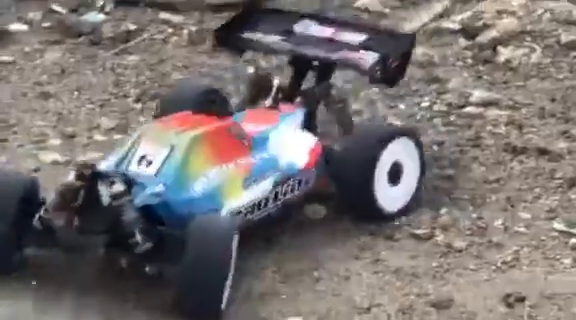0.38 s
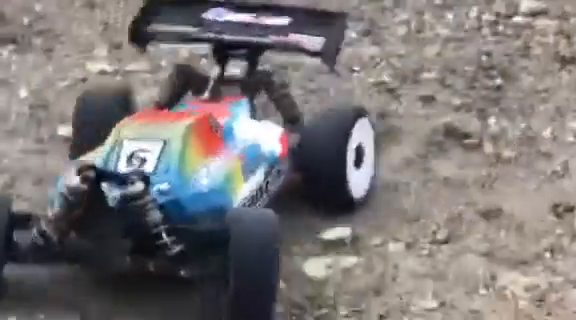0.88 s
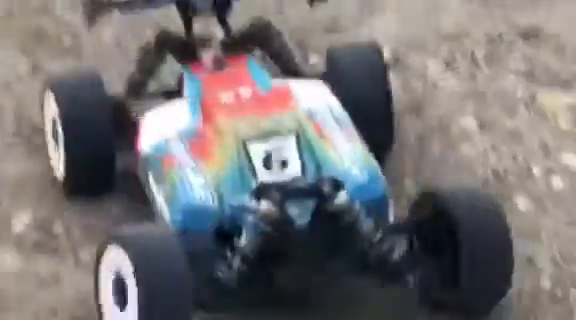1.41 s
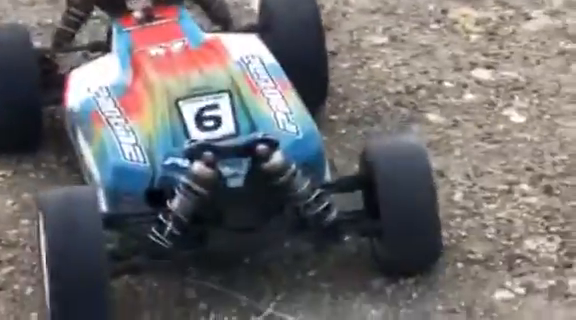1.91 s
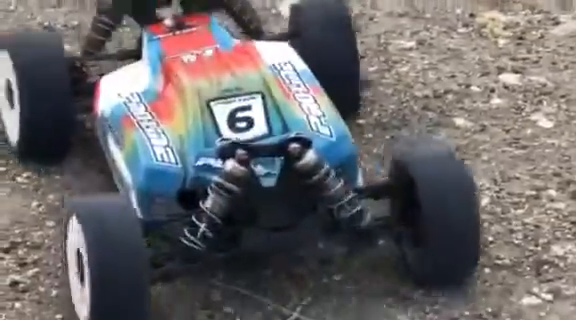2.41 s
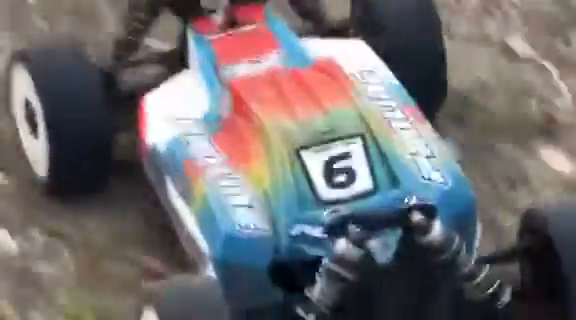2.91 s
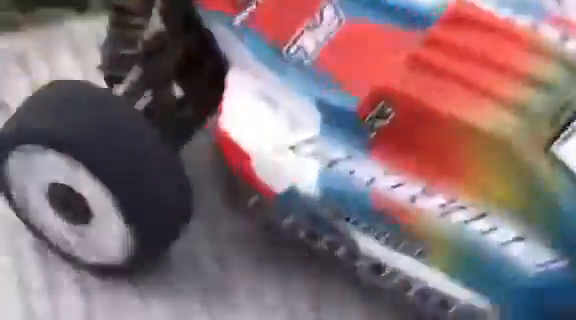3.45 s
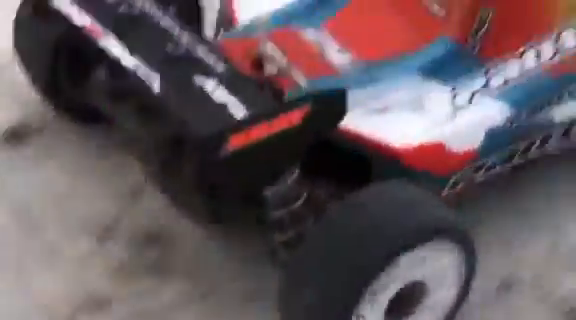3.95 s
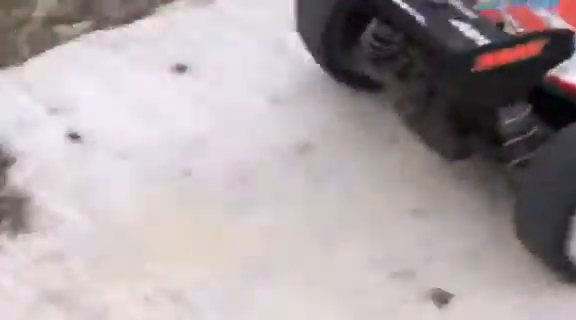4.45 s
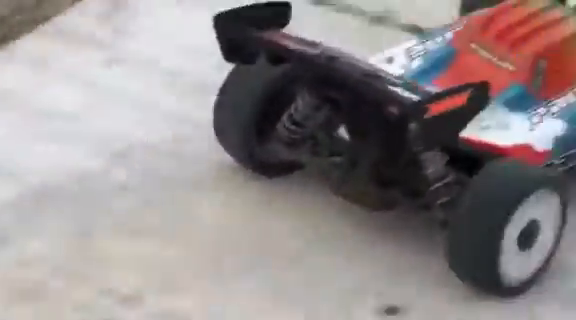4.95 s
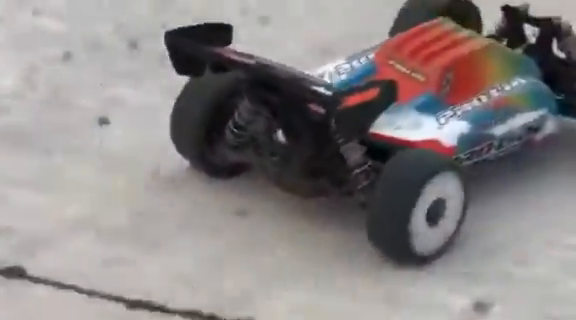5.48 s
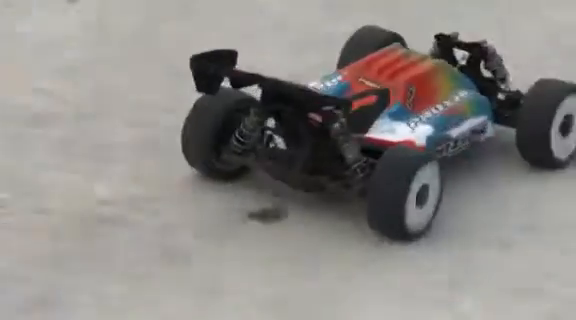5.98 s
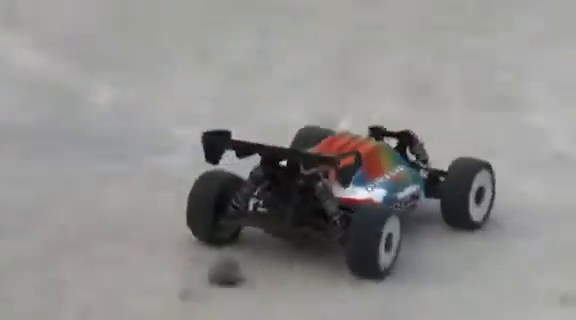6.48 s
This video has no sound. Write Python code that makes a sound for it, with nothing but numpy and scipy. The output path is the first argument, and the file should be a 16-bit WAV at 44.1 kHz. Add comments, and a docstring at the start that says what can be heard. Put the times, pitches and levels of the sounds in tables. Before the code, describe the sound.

A quiet outdoor hush opens, then at about 0.2 s a small electric buggy gives a short, rough buzz with hard plastic knocks. A second burst from 0.65 to 1.1 s swoops quickly up in pitch and back down, gears whining and scraping. From 1.1 to 2.4 s it is almost still: faint ticks, a few thin distant bird chirps, a sharper one near 2.3 s. At 2.4 s it clacks into motion, and a wavering mid-pitched whine climbs with hollow rattle and gravel crunch. The loudest cluster of knocks comes around 4.1 s, and the whine keeps rising until 4.7 s. It drops to a faint coasting rattle while wind thumps begin. At 5.25 s knocks start the last run, noisy and dry, rising to about twice its pitch by 6.6 s, with a hard clack near 6.4 s under heavy low wind buffeting.

```python
"""Outdoors on gravel, a small electric buggy runs in short bursts of throttle beside a microphone.
Meshing gear teeth whine and scrape, throbbing once a motor turn, and ring the plastic chassis as resonators;
the drive knocks as it takes up slack, and the crunch of gravel (clusters of resonant pings) comes and goes.
Wind eddies (slowly modulated low-frequency noise) buffet the microphone.
A few far birds (gliding sines with echoes) chirp over a quiet hush of flickering filtered noise."""
import sys
import numpy as np
from scipy import signal
from scipy.fft import rfft, irfft, next_fast_len
from scipy.io import wavfile
from scipy.ndimage import uniform_filter1d

SR = 44100
rng = np.random.default_rng(int(sys.argv[2]) if len(sys.argv) > 2 else 0)


def magnitude_from_level(level_db):
    """Linear magnitude for a level in decibels (20 dB per decade)."""
    exponent = np.asarray(level_db, float) / 20
    return 10 ** exponent


def store_wav(level_fs):
    """Save 16-bit WAV to argv[1]."""
    pcm = np.round(np.clip(np.atleast_2d(level_fs), -1, 1) * 32767)
    wavfile.write(sys.argv[1], SR, pcm.T.astype(np.int16))


N = 291721
T = np.arange(N) / SR  # time, s

# bursts of throttle, one list each: t/s, tooth rate f/Hz, whine level/dB, clatter level/dB, sizzle level/dB
THROTTLE_BURSTS = [
    [(0.219, 602, -47, -51, -55), (0.308, 608, -66, -47, -54.5), (0.374, 592.5, -51, -45.5, -58.5),
     (0.443, 595, -55, -56.5, -55.5)],
    [(0.647, 582.6, -57, -54, -52), (0.686, 641, -41, -51, -52), (0.71, 704.5, -50, -43, -54),
     (0.745, 831, -40.5, -47, -44.5), (0.81, 928, -41, -44.5, -47), (0.86, 700, -50.5, -43, -54.5),
     (0.924, 581, -47.5, -51, -54), (0.986, 630, -48, -50.5, -55.5), (1.074, 598, -44, -49, -52),
     (1.108, 581.1, -51.5, -56, -58)],
    [(2.398, 419.5, -62, -41.5, -40.5), (2.452, 438.6, -42, -42.5, -52), (2.61, 444, -50.5, -48, -59),
     (2.69, 545.6, -46.5, -48, -56.5), (2.82, 612.3, -44, -49, -53.5), (2.958, 666, -40.5, -48.5, -56.5),
     (3.03, 633, -41, -46, -55.5), (3.32, 638.7, -48, -43, -50), (3.37, 649, -43.5, -40.5, -47.5),
     (3.47, 681.6, -41, -42.5, -48.5), (3.584, 684.3, -43, -41, -48.5), (3.674, 698, -43.5, -41.5, -46),
     (3.88, 738, -38, -43.5, -47.5), (3.94, 779.7, -41, -43, -47)],
    [(4.045, 747.5, -43.5, -41.5, -40), (4.135, 772, -33, -49, -45), (4.153, 769.5, -44.5, -44.5, -46.5),
     (4.26, 813.4, -41.5, -46, -51), (4.4, 834, -40, -44.5, -50), (4.483, 841, -44, -45, -49),
     (4.56, 862, -41.5, -47, -50), (4.681, 868, -40.5, -46, -50.5), (4.705, 873, -43, -48, -57)],
    [(5.25, 614.6, -60, -55, -52), (5.295, 600, -46, -41, -46), (5.32, 610, -43.5, -41.5, -50.5),
     (5.42, 670, -40.5, -47.5, -54.5), (5.52, 721.6, -44.5, -44.5, -52.5), (5.62, 771.4, -47, -46, -56),
     (5.7, 845, -44.5, -44.5, -54.5), (5.8, 872, -47, -42, -51.5), (5.91, 883, -44, -43, -49.5),
     (5.93, 956, -58, -45.5, -53.5), (5.98, 1013, -50.5, -43.5, -52.5), (6.1, 1107, -60, -42, -52.5),
     (6.2, 1185, -52.5, -45.5, -51.5), (6.355, 1222, -50, -44.5, -52.5), (6.409, 1230, -55, -47.5, -51.5),
     (6.61, 1250, -49.5, -49, -55)],
]
# rolling off throttle: start t/s, clatter level/dB, tub ring level/dB, sizzle level/dB, fade/(dB/s)
COASTING = [(0.0, -68, -59, -56, 13), (0.048, -72, -61.5, -83, -4), (0.443, -59, -60, -68, 48),
            (1.108, -60, -66, -65.5, 27), (3.94, -47.5, -53, -50, -1), (4.705, -55.5, -58, -56.5, 4)]
# colour of each burst as the buggy turns: tub ring over clatter level/dB at its start, at its end,
# initial surge of the sizzle level/dB
FACING_COLOUR = [(4, 2.5, 2.7), (8.5, 4.5, 1.8), (-10, 6, 3.4), (5.5, 2.5, 3.8), (0.5, -11, 4)]
# timbre of the gears: t/s, buzz over whine level/dB, gearbox ring over sizzle level/dB,
# gearbox ring f/Hz, gravel over sizzle level/dB
GEAR_TIMBRE = [(0.22, 2, -11, 2670, -7), (0.44, -2.5, -8, 2630, -3.5), (0.65, 0, 1, 2890, -1),
               (0.8, -4.5, -16, 3060, 5.5), (1.1, -6, -7, 2730, 2), (2.4, -19, -4.5, 2720, 1),
               (2.62, -2.5, -1, 2780, 9.5), (2.74, -4.5, -9, 2930, 7.5), (2.95, -10.5, 7, 2840, 8),
               (3.2, -10, -2, 2830, 6.5), (3.4, -20, -2.5, 2760, 0), (3.75, -17.5, -1.5, 2790, -13),
               (3.94, -17, -8, 2850, -23), (4.05, -10, -11, 2610, -14), (4.3, -11, 2, 2510, -3),
               (4.7, -19, -6.5, 2540, -14), (5.26, -9, -32, 2880, -19), (5.6, -7, -7, 2950, 0.5),
               (5.9, -8, -10, 2940, 1.5), (5.97, 10, -7, 2970, 1.5), (6.08, 9, -15, 3200, 5.5),
               (6.2, -13, -24, 3030, -18), (6.61, -23, -29, 3050, -12)]
# how deeply the tooth rate hunts up and down: t/s, depth (relative)
HUNT_DEPTH = [(0.2, .04), (1.1, .04), (2.4, .04), (2.75, .028), (3.3, .022), (3.36, .06), (3.9, .055),
              (4.1, .025), (4.7, .03), (5.3, .04), (5.9, .035), (6.6, .02)]
# axle gear rates as shares of the pinion's tooth rate (ratio)
AXLE_RATE_RATIOS = (.87, 1.11)
# jolts as the teeth bite or a stone strikes the chassis: t/s, peak level/dB, chatter rate f/Hz,
# length t/s, crack over chatter level/dB
JOLTS = [(0.115, -42.5, 578, 0.013, -14), (0.219, -24.5, 843, 0.028, 1), (0.232, -27, 778, 0.016, -7),
         (0.244, -36, 557, 0.013, -8), (0.295, -26.5, 577, 0.0082, -18), (0.328, -30.5, 735, 0.015, -14),
         (0.65, -24, 604, 0.0067, 15), (0.669, -20.5, 646.5, 0.014, -6), (0.741, -21.5, 906, 0.029, -17),
         (0.725, -26, 766, 0.011, -24), (0.91, -29, 560, 0.015, -23.5), (1.237, -43, 624, 0.03, -5),
         (1.876, -51, 1315, 0.02, -9), (1.931, -48, 1301, 0.088, -5), (2.395, -30, 570, 0.016, -6),
         (2.412, -22.5, 648, 0.013, 15), (2.515, -21, 617.6, 0.023, -25), (2.771, -46, 650, 0.018, -13),
         (3.273, -24, 659, 0.034, -25), (2.864, -29, 611, 0.012, -6), (3.012, -33, 664.5, 0.013, -8),
         (3.342, -21, 600.6, 0.017, -3), (3.374, -25.5, 1084, 0.016, -21), (3.418, -30, 655, 0.016, -5),
         (3.755, -35, 728.5, 0.014, -11), (4.011, -39, 819, 0.034, 1), (4.04, -25.5, 872, 0.014, -6),
         (4.067, -15, 769, 0.018, -4), (4.096, -21, 756, 0.015, -16), (4.12, -13, 800.6, 0.025, -28),
         (4.201, -25, 849, 0.014, -10), (4.233, -20.5, 815.5, 0.015, -21), (4.439, -27, 836, 0.029, -13),
         (4.77, -31, 765, 0.032, -6.5), (4.85, -41, 1440, 0.042, -14), (4.94, -41, 735, 0.013, -1),
         (5.253, -31, 698, 0.01, -2), (5.266, -24, 707, 0.012, -3), (5.278, -16.5, 687.3, 0.013, -4),
         (5.331, -23.5, 621, 0.015, -28), (5.865, -25, 861, 0.022, -22), (6.376, -15.5, 620, 0.017, -6),
         (6.39, -28.5, 639, 0.035, 0)]
# modes of the plastic chassis: f/Hz, bandwidth f/Hz, relative level/dB
CHASSIS_MODES = [(560, 97, -4), (872, 118, -1.5), (1240, 320, -1), (1398, 120, 1), (1805, 86, -2.5),
                 (2186, 71, 1), (2338, 27, -2), (2680, 320, -15), (3600, 960, -14.5), (3880, 210, -22.5),
                 (5050, 250, -28), (6200, 56, -8.5), (8500, 120, -15)]
# spectral shape of the clatter: f/Hz, relative level/dB
CLATTER_SHAPE = [(210, -42), (350, -4), (526, -6.5), (599, 3), (951, -0.5), (1470, -2.5), (1960, 3),
                 (2490, -10.5), (3200, -56), (4160, -59.5), (7040, -120)]
# spectral shape of the sizzle and gravel: f/Hz, relative level/dB
SIZZLE_SHAPE = [(1470, -9.5), (2500, 0), (3150, -0.5), (4380, -1), (4980, -8.5), (6800, -6), (8520, -6.5),
                (9190, -20), (9960, -65.5), (12900, -104), (21900, -120)]
# the breeze under the gusts: t/s, rumble level/dB, flutter above it level/dB
BREEZE = [(0.0, -50, -4), (0.4, -51, 6), (0.86, -48.5, -7), (0.96, -45, -2.5), (2.03, -49, 1.5),
          (2.4, -48, 2), (2.89, -50, -5), (3.46, -48.5, 4), (3.83, -49, 17.5), (4.1, -45, 7),
          (4.64, -45.5, 6.5), (4.85, -37.5, 0.5), (5.5, -31, -17.5), (5.9, -43, -14), (6.3, -28.5, -15),
          (6.61, -35.5, -16)]
# eddies that thump the microphone: t/s, peak level/dB, length t/s, flutter above it level/dB
EDDIES = [(0.194, -45.5, 0.2, -1), (0.44, -42.5, 0.037, -3), (2.076, -43.5, 0.063, -19),
          (2.428, -29.5, 0.054, 3), (2.468, -27.5, 0.055, 13), (2.619, -37, 0.092, -20),
          (2.976, -40, 0.12, 2), (3.174, -35.5, 0.037, -32), (3.906, -41.5, 0.099, 1),
          (4.152, -36.5, 0.061, -15), (4.312, -37, 0.029, -22), (4.471, -26.5, 0.028, -25),
          (4.543, -30.5, 0.031, -27), (4.783, -36, 0.056, 0), (4.933, -20, 0.038, -10),
          (4.988, -21, 0.025, -6), (5.069, -27, 0.085, -22), (5.214, -28, 0.019, -16),
          (5.258, -20.5, 0.026, -10), (5.395, -31, 0.041, -14), (5.569, -21, 0.043, -15),
          (5.641, -28, 0.033, -12), (5.761, -31.5, 0.046, -16), (5.842, -27, 0.031, -20),
          (5.908, -28, 0.029, -28), (5.972, -20.5, 0.078, -8), (6.062, -20.5, 0.014, -20),
          (6.134, -19, 0.017, -8), (6.188, -22.5, 0.022, -17), (6.25, -21, 0.052, -24),
          (6.325, -18, 0.014, -7), (6.443, -22, 0.047, 4.5)]
# spectral shape of the wind rumble before its band limits: f/Hz, relative level/dB
RUMBLE_SHAPE = [(12, -36), (20, -24), (50, 5), (107, 2.5), (141, 3), (242, -9), (344, -19), (380, -28.5),
                (400, -38), (520, -43), (880, -120)]
# far birds: start t/s, length t/s, first f/Hz, middle f/Hz, last f/Hz, level/dB
BIRD_CHIRPS = [(.14, .025, 3100, 2800, 2400, -68), (1.1, .1, 4300, 4200, 4080, -74),
               (1.325, .015, 6500, 5600, 4700, -70), (1.49, .06, 5350, 6100, 5600, -71),
               (1.495, .06, 3750, 4050, 3850, -71), (1.808, .014, 6200, 5900, 5600, -73),
               (1.826, .012, 6100, 5600, 5000, -68), (1.837, .012, 5900, 5400, 4900, -73),
               (2.14, .13, 5000, 4650, 4300, -74.5), (2.272, .014, 6600, 5800, 5000, -68),
               (2.287, .013, 6800, 5900, 4900, -61), (2.298, .013, 6500, 5800, 5100, -67),
               (6.494, .013, 3500, 3300, 3150, -52)]
# spectral shape of the outdoor hush: f/Hz, relative level/dB
HUSH_SHAPE = [(150, -41), (250, -6), (516, -18), (1030, -16.5), (1300, -17.5), (1550, -16.5), (1800, -16.5),
              (2100, -23.5), (2560, -23), (5460, -30), (9220, -33.5), (9960, -75), (12900, -86),
              (21900, -120)]
# narrow dips that come and go: f/Hz, bandwidth f/Hz, depth about which each wanders (0-1)
TREBLE_DIPS = [(2050, 110, .2), (2750, 130, .3), (3500, 150, .25), (4200, 150, .15), (4900, 200, .7),
               (5900, 250, .3), (6700, 250, .25), (7600, 300, .7), (8200, 250, .5), (9150, 500, .6)]

PINION_TEETH = 21
TUB_HZ = 1436  # the mode that rings most readily
AXLE_DB, FULL_HUNT = -6, .06  # axle gears have this median level where hunting reaches FULL_HUNT
SURGE_S = 0.018  # the sizzle flares as the motor takes the load
GUST_SKEW = 1.03  # an eddy dies away this much slower than it comes
HUSH_DB = -59


def level(x, db):
    """Normalisation: scale a signal to an rms level in dB."""
    return x * magnitude_from_level(db) / np.sqrt(np.mean(x ** 2))


def curves(rows):
    """Linear interpolation: columns of a table as one value per sample."""
    s, *columns = np.transpose(rows)
    return [np.interp(T, s, c) for c in columns]


def colour(x, points):
    """Linear filtering: weight the spectrum by (Hz, dB) points on a logarithmic frequency axis."""
    hz, db = np.transpose(points)
    size = next_fast_len(N)
    f = np.maximum(np.arange(size // 2 + 1) * SR / size, 1)
    gain = magnitude_from_level(np.interp(np.log(f), np.log(hz), db))
    return irfft(rfft(x, size) * gain, size)[:N]


def ring(x, hz, width_hz):
    """Resonance: a single mode with quality factor hz / width_hz."""
    return signal.lfilter(*signal.iirpeak(hz, hz / width_hz, SR), x)


def sliding_ring(x, hz, width_hz):
    """Heterodyning: shift to zero frequency, smooth and shift back, so the resonance can move."""
    turn = np.exp(2j * np.pi * np.cumsum(hz) / SR)
    slow = signal.lfilter([1], [1, -np.exp(-np.pi * width_hz / SR)], x / turn)
    return (slow * turn).real


def walk(rate):
    """Random modulation: levels held 1 / rate s and slewed twice, with a spread near 1."""
    k = int(SR / rate)
    held = np.repeat(rng.standard_normal(N // k + 1), k)
    return 1.3 * uniform_filter1d(uniform_filter1d(held, k), k)[:N]


def grit(rate, spread_db):
    """Random impulses: sparse clicks, mostly small, a few large, at unit rms."""
    hit = rng.random(N) < rate / SR
    size_db = spread_db * np.minimum(rng.exponential(size=N), 3.5)
    return level(hit * rng.standard_normal(N) * magnitude_from_level(size_db), 0)


def grain(x, flicker_db):
    """Independent band modulation: each third of an octave of the treble flickers on its own."""
    return sum(magnitude_from_level(flicker_db * walk(45)) * ring(x, hz, hz / 5) for hz in np.geomspace(1600, 9000, num=9))


def chassis(x, flicker_db=0.):
    """Modal superposition: tub and shell ring when shaken; with flicker each mode rattles in its own time."""
    out = 0
    for hz, width_hz, db in CHASSIS_MODES:
        if flicker_db:
            db = db + flicker_db * walk(30)
        out = out + magnitude_from_level(db) * ring(x, hz, width_hz)
    return out


def drive():
    """Gear-mesh excitation: uneven teeth, loaded once a turn by the off-centre pinion, whine and rattle."""
    hz, whine_db, clatter_db, sizzle_db = curves([row for burst in THROTTLE_BURSTS for row in burst])
    buzz_over_db, box_db, box_hz, gravel_db = curves(GEAR_TIMBRE)
    on = sum((T > burst[0][0]) & (T < burst[-1][0]) for burst in THROTTLE_BURSTS)
    on = uniform_filter1d(1. * on, size=60)
    hunt = curves(HUNT_DEPTH)[0]
    teeth = np.cumsum(hz * (1 + .02 * walk(70) + .5 * hunt * walk(28))) / SR  # teeth passed so far
    turn = 2 * np.pi * teeth / PINION_TEETH
    load_db = 3.2 * np.cos(turn) + 0.42 * np.cos(2 * turn + 1.0) + 1.36 * walk(45)
    whine = on * gear_whine(teeth, load_db, hunt, whine_db, whine_db + buzz_over_db)
    shake = scrape(teeth, on, load_db)
    body, tub, sizzle = rattle(shake)
    moving_hz = box_hz * (1 + 0.0088 * walk(25))
    box = level(magnitude_from_level(1.6 * walk(40)) * sliding_ring(shake, moving_hz, 170), 0)
    treble = sizzle + magnitude_from_level(box_db) * box + magnitude_from_level(gravel_db) * level(colour(gravel(), SIZZLE_SHAPE), 0)
    clatter_db, tub_db, treble_db = rattle_levels(clatter_db, sizzle_db)
    return magnitude_from_level(clatter_db) * body + magnitude_from_level(tub_db) * tub + magnitude_from_level(treble_db) * treble + whine


def gear_whine(teeth, load_db, hunt, whine_db, buzz_db):
    """Harmonic synthesis: the tooth rate and its partials, amplitude-modulated by the load."""
    # play in the gears makes each tooth land early or late, which smears the upper partials most
    mesh = 2 * np.pi * teeth + .28 * walk(250)
    # the axle gears sing just under and over the pinion, coming and going
    axles = sum(magnitude_from_level(AXLE_DB + 5 * walk(22)) * np.sin(ratio * mesh) for ratio in AXLE_RATE_RATIOS)
    pinion = magnitude_from_level(2.8 * walk(22.21)) * np.sin(mesh)
    tone = magnitude_from_level(load_db) * (pinion + axles * hunt / FULL_HUNT)
    partials = sum(magnitude_from_level(-6. * k + 2.7 * walk(60)) * np.sin(k * mesh + .5 * walk(150)) for k in range(2, 5))
    bite = magnitude_from_level(load_db) * partials
    buzz = level(bite, -4.0) + level(chassis(bite), 0.72)
    return magnitude_from_level(whine_db) * level(tone, 1.26) + magnitude_from_level(buzz_db) * buzz


def scrape(teeth, on, load_db):
    """Friction noise: loose teeth, bearings and tyres scrape after each tooth, with grit thrown up."""
    after_tooth = np.exp(-(teeth % 1) / 0.57)  # decay in tooth periods
    noise = (0.79 + on * after_tooth) * rng.standard_normal(N)
    return magnitude_from_level(0.43 * on * load_db) * (level(noise, 0) + magnitude_from_level(-2.5) * grit(1500, 1.4))


def rattle(shake):
    """Forced vibration: one shaking drives the chassis body, the tub mode and the treble sizzle."""
    panels = chassis(shake, flicker_db=2.2)
    low, high = (signal.sosfilt(signal.butter(4, 2700, side, fs=SR, output="sos"), panels)
                 for side in ("low", "high"))
    body = level(magnitude_from_level(1.45 * walk(25)) * colour(shake, CLATTER_SHAPE), 0.13) + level(low, -1.4)
    tub = level(ring(ring(shake, TUB_HZ, 230), TUB_HZ, 330), -4.0)
    sizzle = level(grain(colour(shake, SIZZLE_SHAPE), flicker_db=4.5), -2.2) + level(high, -13.0)
    return body, tub, sizzle


def rattle_levels(clatter_db, sizzle_db):
    """Envelopes: clatter, tub and treble follow each burst, then the coasting that comes after it."""
    clatter_db, tub_db, treble_db = clatter_db.copy(), clatter_db.copy(), sizzle_db.copy()
    for burst, (tub_first, tub_last, surge_db) in zip(THROTTLE_BURSTS, FACING_COLOUR):
        start, end = burst[0][0], burst[-1][0]
        now = T >= start
        tub_db[now] = (clatter_db + np.interp(T, [start, end], [tub_first, tub_last]))[now]
        treble_db[now] = sizzle_db[now] + surge_db * np.exp(-(T[now] - start) / SURGE_S)
    for s, *first_db, fade in COASTING:
        next_burst = min(burst[0][0] for burst in THROTTLE_BURSTS if burst[0][0] > s)
        now = (T >= s) & (T < next_burst)
        for curve, db in zip((clatter_db, tub_db, treble_db), first_db):
            curve[now] = db - fade * (T[now] - s)
    return [uniform_filter1d(c, size=350) for c in (clatter_db, tub_db, treble_db)]


def gravel():
    """Damped resonance: stones of many sizes crunch under the tyres, each size with a short, soft ping."""
    out = 0
    for hz in np.geomspace(1100, 7500, num=28):
        ping = ring(ring(grit(220, .8), hz, 150), hz, 300)
        out = out + magnitude_from_level(3 * walk(12)) * ping
    return level(out, 0)


def knocks():
    """Impact excitation: a few hard tooth strikes in a row, opened by a crack, ring the chassis."""
    out = np.zeros(N + SR)
    t = T[:3000]
    noise = rng.standard_normal((len(JOLTS), len(t)))
    for (s, db, hz, length, crack_db), n in zip(JOLTS, noise):
        swell = np.sin(np.pi * np.clip(t / length, 0, 1) ** 0.57) ** 2
        strikes = np.diff(np.floor(hz * t), prepend=0) * (1 + 0.77 * n)
        strikes = signal.lfilter([1], [1, -.75], swell * strikes)  # plastic teeth give a soft contact
        chatter = chassis(strikes) + .5 * ring(strikes, hz, 240)
        crack = n * np.minimum(t / 0.0036, 1) * np.exp(-t / (0.16 * length))
        crack = chassis(crack) + .09 * crack
        hit = chatter / np.abs(chatter).max() + magnitude_from_level(crack_db) * crack / np.abs(crack).max()
        i = int(s * SR) - 40  # samples; starts just ahead of the listed time
        out[i:i + len(t)] += magnitude_from_level(db) * hit / np.abs(hit).max()
    return out[:N]


def wind():
    """Turbulent pressure: eddies thump on the microphone port as low noise, with a higher flutter."""
    breeze_db, flutter_db = curves(BREEZE)
    low = magnitude_from_level(breeze_db + 1.5 * walk(12))
    high = low * magnitude_from_level(flutter_db + 2.96 * walk(9))
    for s, db, length, above_db in EDDIES:
        half = length * np.where(T > s, GUST_SKEW, 1) / 2
        eddy = magnitude_from_level(db) * np.exp(-((T - s) / half) ** 2)
        low, high = np.hypot(low, eddy), np.hypot(high, magnitude_from_level(above_db) * eddy)  # powers add
    rumble = colour(rng.standard_normal(N), RUMBLE_SHAPE)
    # compress the rumble, so each gust holds its strength more evenly
    rumble = rumble / uniform_filter1d(rumble ** 2, size=900) ** 0.21
    flutter = ring(ring(rng.standard_normal(N), 215, 240), 270, 410)
    air = low * level(rumble, 0.043) + high * level(magnitude_from_level(2.3 * walk(40)) * flutter, -10.5)
    return signal.sosfilt(signal.butter(3, [36, 520], "band", fs=SR, output="sos"), air)


def birds():
    """Frequency modulation: short gliding whistles waver, smeared by echoes off the ground and walls."""
    out = np.zeros(N)
    waver = magnitude_from_level(2.5 * walk(120))
    for s, length, *hz, db in BIRD_CHIRPS:
        u = np.arange(int(length * SR)) / (length * SR)  # progress through the chirp, 0-1
        pitch = np.polyval(np.polyfit([0, .5, 1], hz, 2), u)
        whistle = np.sin(np.pi * u) ** 0.31 * np.sin(2 * np.pi * np.cumsum(pitch) / SR)
        i = int(s * SR)
        out[i:i + len(u)] += magnitude_from_level(db) * whistle
    echoes = rng.standard_normal(2500) * np.exp(-T[:2500] / .009)
    return waver * out + magnitude_from_level(-19) * signal.fftconvolve(out, echoes)[:N]


def hush():
    """Incoherent sources: distant traffic and leaves as noise, every third of an octave flickering alone."""
    air = rng.standard_normal(N)
    bands = sum(magnitude_from_level(2.5 * walk(7)) * ring(air, hz, hz / 4) for hz in np.geomspace(200, 9500, num=18))
    return level(magnitude_from_level(0.69 * walk(4.0)) * colour(bands, HUSH_SHAPE), HUSH_DB)


def scene():
    """Superposition: all sound pressures add at one microphone."""
    return (drive() + knocks() + wind() + birds() + hush())[None]


def roll_off(x):
    """The treble ends steeply here."""
    return signal.sosfilt(signal.butter(12, 10110, fs=SR, output="sos"), x)


def record(dry):
    """Band rejection: narrow bands sink away for a moment and return; a steep low-pass cuts the top."""
    for hz, width_hz, depth in TREBLE_DIPS:
        dry = dry - np.clip(depth + 1.1 * walk(11), 0, 1) * ring(dry, hz, width_hz)
    mix = signal.sosfilt(signal.ellip(8, .3, 60, 9200, fs=SR, output="sos"), dry)
    return roll_off(mix)


dry = scene()
out = record(dry)
store_wav(out)
```